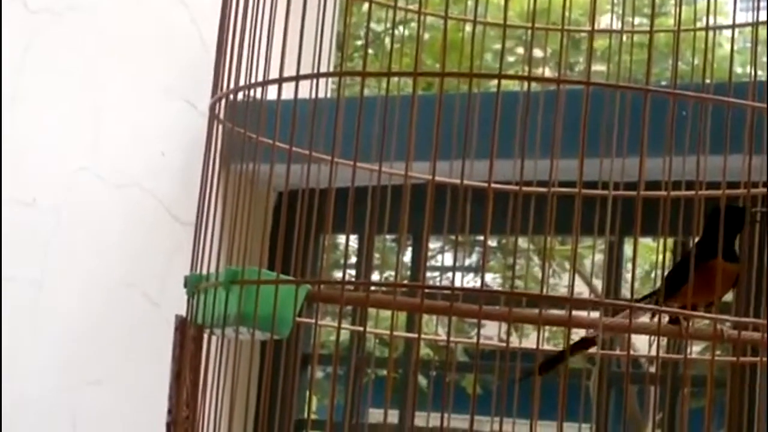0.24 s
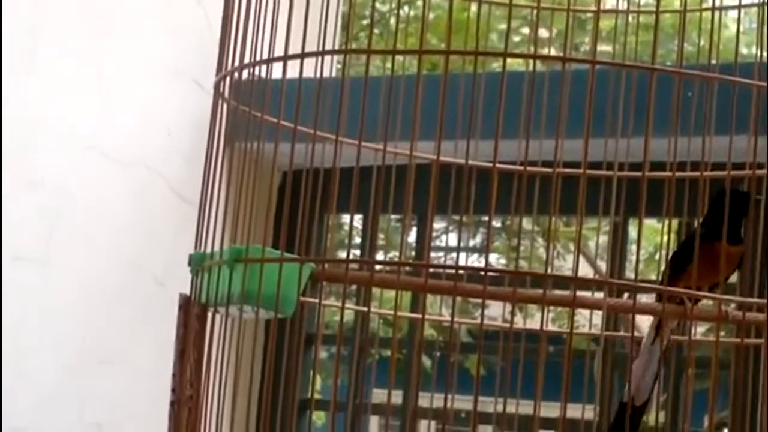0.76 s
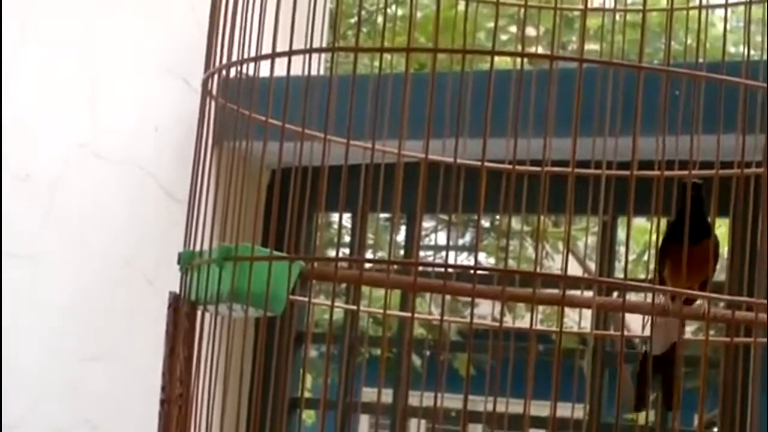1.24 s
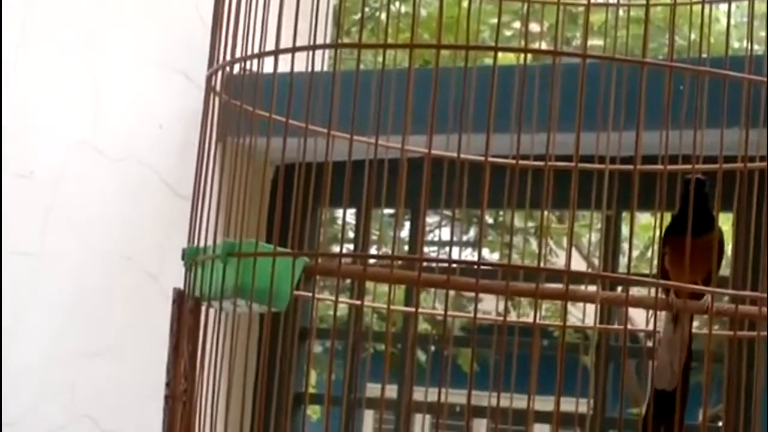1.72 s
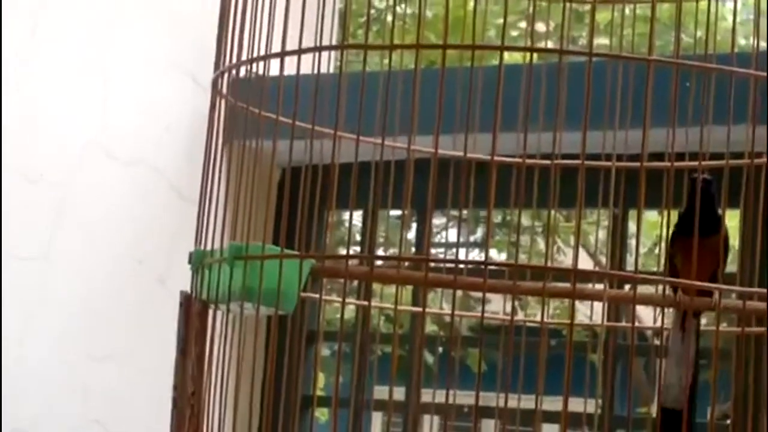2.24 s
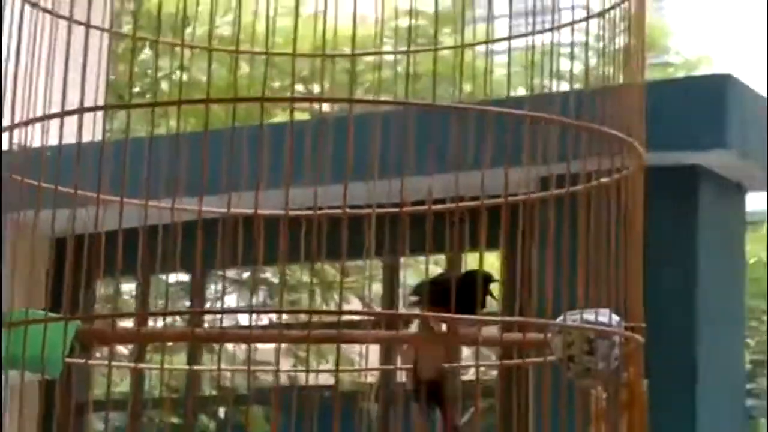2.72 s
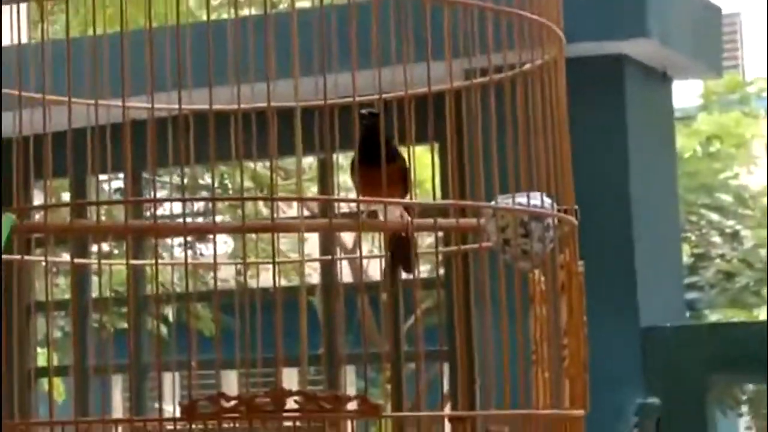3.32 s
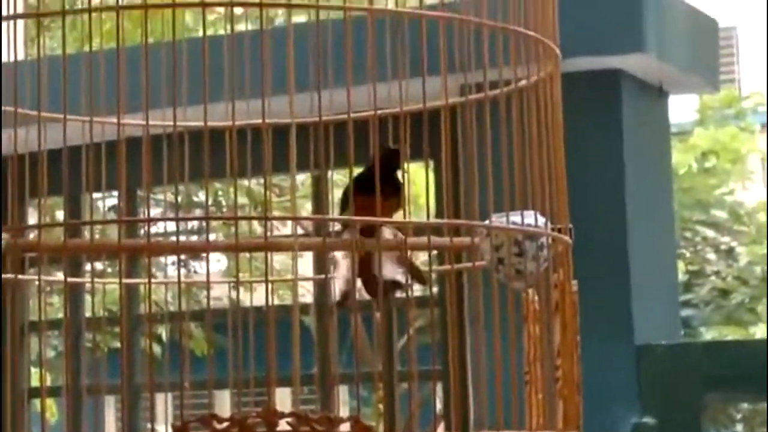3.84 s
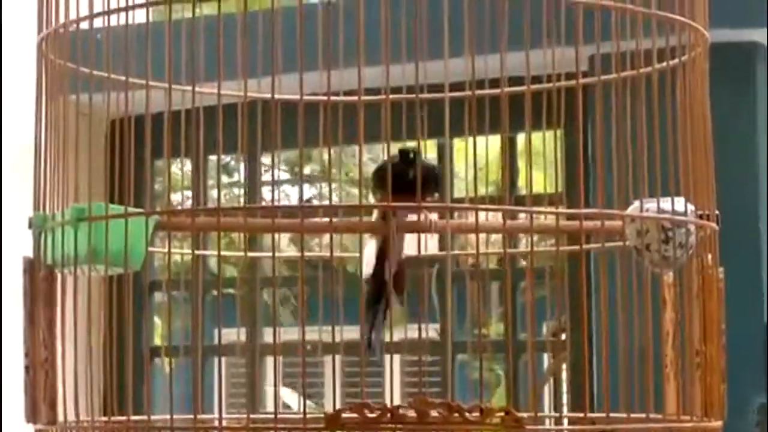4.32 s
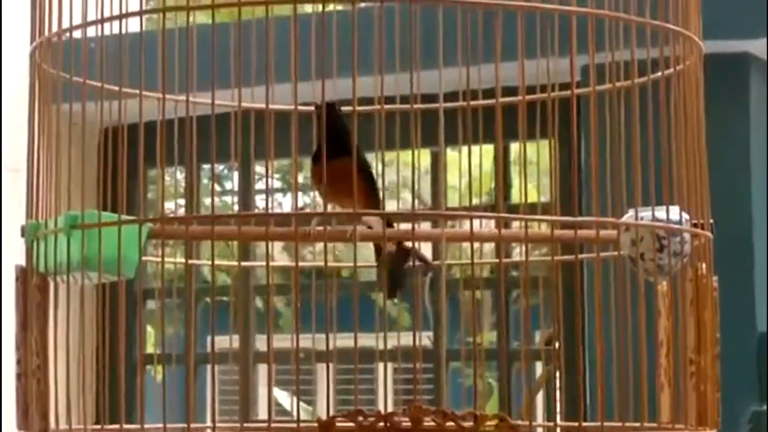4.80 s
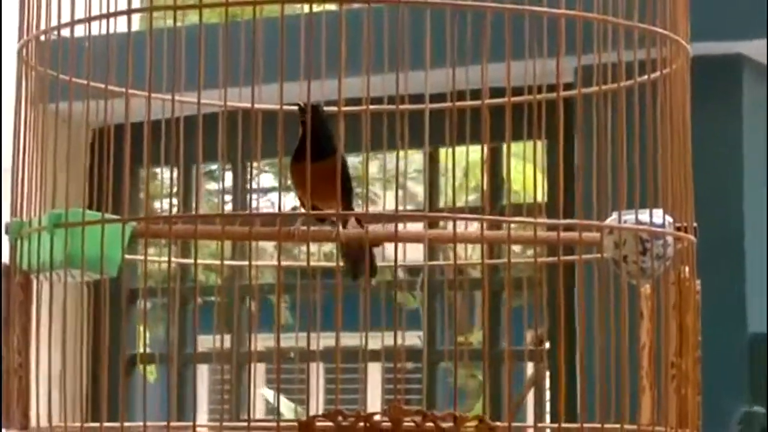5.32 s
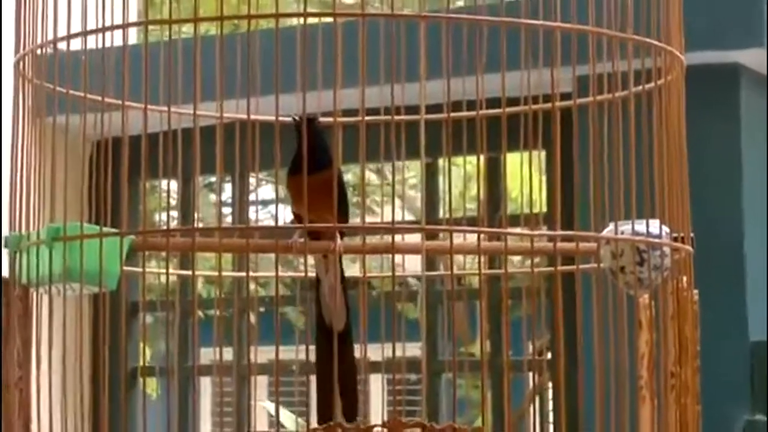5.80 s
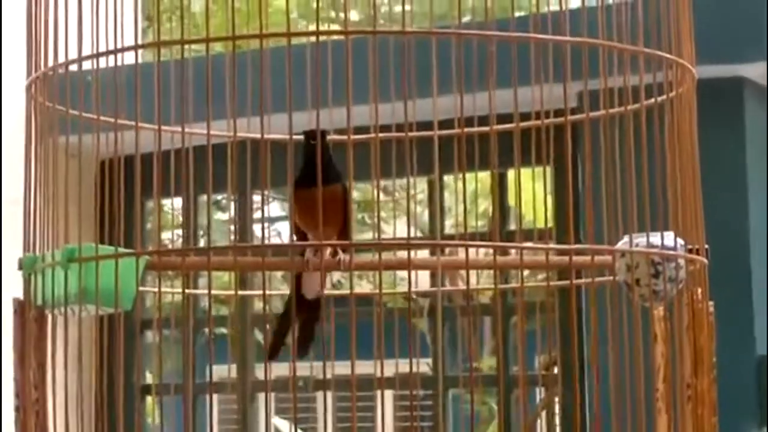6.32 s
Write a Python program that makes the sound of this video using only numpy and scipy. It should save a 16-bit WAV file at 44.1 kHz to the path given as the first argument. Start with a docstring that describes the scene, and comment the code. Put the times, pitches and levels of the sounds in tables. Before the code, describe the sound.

Stereo, fairly close outdoor pickup on a reverberant porch. A small bird chatters quick liquid whistles and dry buzzy trills, pauses, drops four falling yelps, then gives scattered notes and woody clicks from claws or bill. High cricket pulses continue at right. Faint street hush and a distant whine suddenly give way to rougher traffic and a low engine hum, under a final flurry of bright, piercing notes and sweeping two-voiced swoops.

```python
"""Hard-walled porch: a caged shama to the left sings whistles, slurs and buzzy trills with both sides of its syrinx.
Notes are gliding sines with overtones and a little hiss; dry snaps are decaying noise bursts.
A cricket to the right chirps about three times a second in short tones; the walls ring with bird and cricket.
Street noise, quiet at first, with one faint whine, jumps at about four seconds to a louder noise
and the drone of a slowing engine, built from orders of its working cycle."""
import sys
import numpy as np
from scipy import signal
from scipy.fft import rfft, irfft, next_fast_len
from scipy.io import wavfile
from scipy.ndimage import uniform_filter1d, minimum_filter1d, map_coordinates

SR = 44100
rng = np.random.default_rng(int(sys.argv[2]) if len(sys.argv) > 2 else 0)


def bounce(signal):
    """Save signal as a 16-bit WAV file at the path given by the first command-line argument."""
    frames = np.transpose(np.atleast_2d(signal))
    limited = np.clip(frames, -1, 1)
    pcm = np.round(limited * 32767).astype(np.int16)
    wavfile.write(sys.argv[1], SR, pcm)


N = 288855
TIME = np.arange(N) / SR

# Table levels are relative, ahead of the mix gains.
# Clear whistles; overlapping notes come from the two sides of the syrinx:
# (t/s, length/s, start f/Hz, middle f/Hz, end f/Hz, level/dB, place of loudest moment 0-1)
WHISTLES = [(0.0, 0.016, 2100, 2215, 2100, -18.5, 0.12), (.045, .036, 4945, 5060, 5300, -11.5, 0.52),
            (0.1, 0.13, 1542, 1585, 1635, -24.5, 1), (.245, 0.095, 2080, 2140, 1956, -21, 0.88),
            (0.433, 0.043, 1480, 1740, 1650, -25.5, .4), (.474, 0.11, 2045, 2265, 2028, -20.5, 0.25),
            (0.607, 0.096, 3040, 2784, 2743, -16.5, 1), (.666, 0.037, 1210, 1312, 1300, -34.5, 0.77),
            (.778, 0.093, 1903, 1844, 1183, -13.5, 0.092), (0.944, 0.038, 1840, 2527, 2360, -14.5, 0.7),
            (1.04, 0.074, 2225, 1981, 1785, -16.5, 0.4), (1.17, 0.085, 1057, 1630, 1557, -20, 0.99),
            (1.333, 0.045, 1382, 1782, 1838, -8, 0.93), (1.387, 0.05, 1822, 1773, 1780, -12.5, 0.96),
            (1.521, 0.032, 3590, 3196, 2040, -16, 0.44), (2.387, 0.067, 1330, 1232, 967, -18.5, .15),
            (3.324, 0.014, 3010, 2685, 2500, 3, 0.97), (3.503, 0.0188, 2030, 1796, 1640, -16, 0.59),
            (3.51, 0.021, 2750, 3210, 3250, -5.5, 0.73), (4.303, 0.13, 1585, 1250, 1180, -35, 0.26),
            (4.46, 0.052, 1978, 2190, 2160, -23, .35), (4.5, .19, 1202, 1232, 1112, -30.5, 0.26),
            (4.553, 0.032, 2120, 2182, 1930, -15, 0.64), (4.909, 0.05, 2600, 2077, 1787, -21, 0.58),
            (5.003, 0.097, 2876, 3150, 3370, -22.5, 0.72), (5.046, 0.063, 3295, 3619, 3595, -5.5, 0.52),
            (5.101, 0.072, 4850, 5200, 5300, -34, 0.49), (5.17, 0.18, 5290, 5280, 5320, -22, 0.92),
            (5.532, 0.0358, 3234, 3597, 3760, -5.5, 0.4), (5.667, 0.042, 2150, 2920, 3500, -14.5, 0.53),
            (5.709, 0.021, 3580, 3815, 3940, -6, 0.36)]
# Reedy notes with an octave of their own strength:
# (t/s, length/s, start f/Hz, middle f/Hz, end f/Hz, level/dB, octave level/dB)
REEDY_NOTES = [(0.021, 0.026, 2600, 2990, 3420, -24.5, -3), (0.087, 0.036, 2600, 3300, 3310, -25.5, -17),
               (.81, .13, 1947, 2480, 2680, -23.5, -29.5), (.947, .12, 2470, 2900, 2765, -17, -28),
               (2.324, 0.051, 1067, 994, 890, -26.5, -26), (3.291, .038, 3004, 1867, 2820, -10, -17.5),
               (4.037, 0.017, 2060, 1950, 1530, -24.5, -10.5), (4.878, .045, 2234, 2798, 2740, -23, -8.5),
               (5.239, 0.18, 2530, 3198, 3093, -28, -21), (6.056, .07, 1836, 1956, 1845, -37, 4.5)]
# Buzzes on a straight glide: (t/s, length/s, start f/Hz, end f/Hz, level/dB)
BUZZES = [(0.0, 0.015, 5393, 5540, -4), (0.066, 0.021, 5970, 5920, -13), (0.115, 0.038, 5404, 5220, -17),
          (0.163, 0.03, 5530, 5070, -23.5), (1.176, 0.021, 4300, 4170, -16),
          (1.203, 0.068, 4105, 3892, -18), (1.28, 0.047, 3950, 3780, -16.5),
          (1.545, 0.14, 2108, 2209, -15.5), (2.36, 0.0344, 1652, 1918, -11.5),
          (2.7, 0.087, 4163, 4010, -27), (2.941, 0.047, 4130, 4080, -28.5), (3.492, 0.024, 2255, 2510, -11),
          (5.749, 0.065, 3500, 4030, -18.5)]
# Chips, quick downward flicks: (t/s, top f/Hz, level/dB)
CHIPS = [(0.271, 3920, -27), (0.353, 3870, -24), (.433, 4280, -21.5), (1.253, 1605, -24),
         (1.379, 2418, -8.5), (3.109, 3755, -32), (5.728, 3696, -13), (5.786, 4750, -15)]
# Run of low falling yelps: (t/s, top f/Hz, level/dB)
YELPS = [(1.911, 1397, -20.5), (1.974, 1984, -16), (2.056, 1893, -17), (2.149, 1818, -23)]
# Two-voice swoops: (t/s, length/s, level/dB, lower voice start f/Hz, lower voice end f/Hz)
SWOOPS = [(5.437, .08, -12, 3500, 2417), (6.257, .098, -28, 2265, 1310), (6.461, .083, -19, 3340, 2960)]
# Upper voice of every swoop: (start f/Hz, middle f/Hz, end f/Hz)
SWOOP_UPPER_HZ = (5530, 4330, 3236)
# Overtone colour of the beak: (f/Hz, level/dB)
BEAK_COLOUR = [(800, 9.5), (4000, 4), (6200, 4.5), (7000, 5.5), (8700, -3.5), (10500, 2), (12000, 2.5),
               (15000, -1.5)]
# Hiss spectrum in the song: (f/Hz, level/dB)
HISS_COLOUR = [(500, -9.5), (1500, 1), (3500, 10.5), (6000, -12), (7200, -24.5), (8700, -18), (10300, -2),
               (12000, -14.5), (15000, -13)]
# Song is brighter when the open beak points this way: (t/s, overtone and hiss gain/dB)
BEAK_AIM = [(0, 1), (.8, -1), (1.4, 0), (2.3, 6), (3.3, 1), (3.6, -3), (5.1, 6), (5.8, 3), (6.5, -0.5)]
# Left-right balance of the song, shifting with the wall reflections: (t/s, left-minus-right level/dB)
SONG_BALANCE = [(0, 5.5), (.6, 6), (1.2, 3.5), (1.5, 14.5), (2.2, 7), (3.4, 7), (4.5, 6), (5.4, 1.5),
                (6.5, 0.5)]
# Bird stays to the left: (t/s, lead of left ear/s)
LEFT_EAR_LEAD = [(0, 0.00022), (1.3, 0.00016), (3.3, 0.00019), (5, 0.00018), (5.5, 0.00022)]
# Porch reverberation by band: (f/Hz, t60/s, level/dB)
PORCH_BANDS = [(294, 0.22, 21), (993, 0.53, 8.5), (1980, 0.68, 5.5), (3500, 0.5, 8.5), (5560, 0.69, 4.5),
               (7700, 0.33, 2), (10300, 0.41, 13.5), (14400, 0.054, 10)]
# Street noise before and after the jump: (t/s, level/dB)
CALM_LEVELS = [(0.0, -58), (1.75, -64), (3.38, -55.5), (3.8, -68.5), (4.05, -58.5)]
BUSY_LEVELS = [(4.07, -48.5), (4.44, -46), (6.55, -56.5)]
# Their spectra: (f/Hz, relative density/dB per Hz)
CALM_COLOUR = [(25, -19), (60, 1.5), (150, 3), (260, -5.5), (600, -7), (1200, -15), (3000, -18.5),
               (6000, -28.5), (8000, -27.5), (15000, -66.5)]
BUSY_COLOUR = [(25, 9.5), (70, 2.5), (160, 9.5), (260, -2), (550, 2), (850, -7), (1500, -3.5), (3500, -9),
               (6000, -14), (8000, -25), (15000, -83)]
# Street noise shared by the ears: (f/Hz, left-right likeness 0-1)
STREET_LIKENESS = [(50, 0.84), (200, 0.78), (500, 0.42), (1200, 0.4), (3000, 0.1), (10000, 0.082)]
# Cricket chirps: (t/s, level/dB)
CHIRPS = [(0.4099, -26), (0.7037, -25.5), (1.0264, -25.5), (1.3095, -27.5), (1.6006, -31), (1.9264, -30.5),
          (2.2238, -28.5), (2.525, -28), (2.9239, -25), (3.1959, -25.5), (3.4613, -29.5), (3.716, -29),
          (4.274, -34), (4.5463, -30.5), (4.8618, -28.5), (5.1414, -30), (5.4219, -31.5), (5.7328, -35),
          (6.0661, -42), (6.318, -40.5)]
# Bill snaps, wing flicks, claws landing on the perch: (t/s, onset level/dB, decay/s)
SNAPS = [(2.17, -52, 0.035), (2.903, -36, 0.0073), (3.112, -35.5, 0.0029), (4.025, -43.5, 0.0047),
         (4.036, -32.5, 0.0015), (4.503, -31.5, 0.0038), (4.692, -33, 0.0064), (4.852, -36.5, 0.021)]
# Snap spectrum: (f/Hz, level/dB)
SNAP_COLOUR = [(300, -70), (900, 0.5), (2000, -5), (3800, 5.5), (5500, -4), (8000, -7), (11000, -33.5),
               (15000, -33)]
# Engine: (t/s, working cycle f/Hz, firing tone level/dB, rest of drone level/dB)
ENGINE = [(4.06, 34.5, -42.5, -43.5), (4.32, 32.9, -47.5, -38), (4.48, 31.65, -38.5, -36.5),
          (5.13, 29.13, -41.5, -37.5), (5.48, 29.14, -30.5, -38.5), (5.77, 28.7, -48.5, -50.5),
          (6.55, 28.62, -45.5, -41.5)]
# Drone orders: (multiple of cycle frequency, level/dB)
ENGINE_ORDERS = [(1, -4), (2, 5), (3, 2.5), (5, 11), (6, 2), (7, -10), (9, -8.5), (12, -0.5), (15, -3),
                 (17, 3.5), (20, -4), (28, -9)]

RISE_SHARE, RELEASE_S = 0.16, 0.0038  # longer notes take longer to start
DROOP_DB, DROOP_CURVE = 15, 1.583  # weakening on both sides of the loudest moment
REEDY_SMEAR = 0.25
BUZZ_DEPTH, BUZZ_PEAK_AT = 0.069, 0.25  # trill as share of pitch; place of loudest moment
CHIP_S, CHIP_FALL = 0.01822, 0.76  # length; end pitch as share of top
YELP_FALL_HZ_PER_S, YELP_END_HZ = 21000, 777
LOWER_LAG_S, LOWER_DB = 0.016, -10.5  # lower swoop voice: late and softer
STREET_CHANGE_S = 4.057
EDGE_HZ = 15000  # upper band limit


def amp(db):
    """Decibels to gain."""
    return 10 ** (np.asarray(db) / 20)


def unit(x):
    """Scales to rms 1."""
    return x / np.sqrt(np.mean(x ** 2) + 1e-20)


def read(points, hz, axis=1):
    """One table column, interpolated along log frequency."""
    table = np.transpose(points)
    return np.interp(np.log(abs(hz) + 1), np.log(table[0] + 1), table[axis])


def over_time(points, t_s):
    """Second table column, interpolated linearly in time."""
    return np.interp(t_s, *np.transpose(points))


def add(mix, s, sound):
    """Adds a sound to the mix at time s."""
    part = mix[:, max(round(s * SR), 0):][:, :sound.shape[-1]]
    part += sound[..., :part.shape[1]]


def coloured(x, colour):
    """Filters by a spectrum, to rms 1."""
    size = x.shape[-1]
    gain = amp(read(colour, np.fft.rfftfreq(size, 1 / SR)))
    return unit(irfft(rfft(x) * gain, size))


def wander(size, hz):
    """Smooth random signal of rms about 1, low-passed softly around hz."""
    full = next_fast_len(size + 8192)
    low_pass = np.exp(-(np.fft.rfftfreq(full, 1 / SR) / hz) ** 2)
    return unit(irfft(rfft(rng.standard_normal(full)) * low_pass, full))[:size]


def fade(t, length_s, rise_s, fall_s):
    """Soft start and end of a sound."""
    rise = np.clip(t / rise_s, 0, 1)
    fall = np.clip((length_s - t) / fall_s, 0, 1)
    return np.sin(np.pi / 2 * rise * fall) ** 2


def note_hiss(size, level_db=-33):
    """Faint hiss that follows the level of every note."""
    return amp(level_db) * coloured(rng.standard_normal(size), HISS_COLOUR)


def note(s, length_s, pitches_hz, level_db, peak_at, overtone_db, trill=0, smear=0.66, trill_hz=185,
         jitter=0.0061, rough=0.38, flutter=0.043, third_db=-9, higher_db=-14):
    """A nearly pure tone on one smooth glide and one swell; a fast trill of the membrane makes it buzz."""
    t = np.arange(int(length_s * SR)) / SR
    size = len(t)
    places_s = np.linspace(0, length_s, len(pitches_hz))
    glide_hz = np.polyval(np.polyfit(places_s, pitches_hz, len(pitches_hz) - 1), t)
    shake_hz = trill_hz * (1 + 0.093 * wander(size, 59))
    shake = np.sin(2 * np.pi * np.cumsum(shake_hz) / SR)
    trill_share = trill * (shake + rough * wander(size, 510))
    hz = glide_hz * (1 + trill_share + jitter * wander(size, 290))
    phase = 2 * np.pi * np.cumsum(hz) / SR

    swell_db = level_db - DROOP_DB * abs(t / length_s - peak_at) ** DROOP_CURVE
    swell = amp(swell_db) * fade(t, length_s, RISE_SHARE * length_s, RELEASE_S)
    swell *= 1 + flutter * (trill > 0) * shake

    tone = np.sin(phase)
    aim = amp(over_time(BEAK_AIM, s))
    # cycles differ in shape, which smears the overtones
    blur = smear * wander(size, 500)
    for k in range(2, 5):
        # throat may favour the octave; higher overtones start from a capped level
        if k == 2:
            db = overtone_db
        else:
            db = min(overtone_db, -15) + third_db + higher_db * np.log2(k / 3)
        gain = aim * amp(db + read(BEAK_COLOUR, k * hz))
        below_edge = np.clip((EDGE_HZ - k * hz) / 1000, 0, 1)
        tone += gain * np.sin(k * phase + (k - 1) * blur) * below_edge
    # buzzes carry more hiss
    hiss = aim * (1 + 12 * trill) * note_hiss(size)
    return s, swell * (tone + hiss)


def shama():
    """Song as it leaves the beak: six kinds of syllable, each with its own shape."""
    song = np.zeros((1, N))
    for s, length_s, *pitches_hz, db, peak_at in WHISTLES:
        add(song, *note(s, length_s, pitches_hz, db, peak_at, overtone_db=-37.5))
    for s, length_s, *pitches_hz, db in BUZZES:
        add(song, *note(s, length_s, pitches_hz, db, BUZZ_PEAK_AT, overtone_db=-36, trill=BUZZ_DEPTH))
    for s, length_s, *pitches_hz, db, octave_db in REEDY_NOTES:
        add(song, *note(s, length_s, pitches_hz, db, peak_at=0.45, overtone_db=octave_db, smear=REEDY_SMEAR))
    for s, top_hz, db in CHIPS:
        fall_hz = (top_hz, top_hz * CHIP_FALL)
        add(song, *note(s, CHIP_S, fall_hz, db, peak_at=0.62, overtone_db=-27.5, trill=0.055))
    for s, top_hz, db in YELPS:
        length_s = (top_hz - YELP_END_HZ) / YELP_FALL_HZ_PER_S
        add(song, *note(s, length_s, (top_hz, YELP_END_HZ), db, peak_at=0.23, overtone_db=-51.5))
    for s, length_s, db, *lower_hz in SWOOPS:
        add(song, *note(s, length_s, SWOOP_UPPER_HZ, db, peak_at=0.62, overtone_db=-28.5,
                        smear=3.5, jitter=0.011))
        add(song, *note(s + LOWER_LAG_S, length_s, lower_hz, db + LOWER_DB, peak_at=0.49, overtone_db=-19))
    return song


def ear_delay(pair):
    """Direct sound from the left reaches the left ear a little before the right."""
    lag = over_time(LEFT_EAR_LEAD, TIME) * SR
    return np.array([pair[0], map_coordinates(pair[1], [np.arange(N) - lag], order=5)])


def near_wall(pair, left_s=0.0028, right_s=0.0055, wall_db=-11):
    """The wall beside the cage sends back a quick echo, which makes gliding notes flutter."""
    echo = [np.interp(TIME - delay_s, TIME, side, left=0) for side, delay_s in zip(pair, (left_s, right_s))]
    return pair + amp(wall_db) * np.array(echo)


def porch(x, gap_s=0.0019, early_db=4, early_s=0.034, walls_db=-11):
    """A few slaps from the nearest walls and a dense tail in which each band dies at its own speed."""
    taps = rng.standard_normal((2, SR)) * (rng.random((2, SR)) < 4000 / SR)
    hz, t, z = signal.stft(taps, SR, nperseg=256)
    band_db = read(PORCH_BANDS, hz, axis=2)[:, None]
    decay_db = 60 * t / read(PORCH_BANDS, hz)[:, None]
    z = z * amp(band_db - decay_db + early_db * np.exp(-t / early_s))
    tail = signal.istft(z, SR, nperseg=256)[1][:, :SR]
    tail = tail * np.clip(TIME[:SR] / gap_s - 1, 0, 1)
    tail /= np.linalg.norm(tail, axis=1, keepdims=True)
    for side in tail:
        slaps = (SR * rng.uniform(0.005, 0.035, size=6)).astype(int)
        side[slaps] += amp(walls_db) * rng.choice([-1, 1], size=6)
    return signal.fftconvolve(x, tail, axes=1)[:, :N]


def street(levels, colour, level_db):
    """Distant traffic as coloured noise, most alike in both ears in the bass, swelling gently."""
    a, b = rfft(rng.standard_normal((2, N)))
    same = np.clip(read(STREET_LIKENESS, np.fft.rfftfreq(N, 1 / SR)), -1, 1)
    pair = irfft(np.array([a, same * a + np.sqrt(1 - same ** 2) * b]), N)
    swell_db = 0.9 * wander(N, 6)
    return coloured(pair, colour) * amp(over_time(levels, TIME) + level_db + swell_db)


def cricket(stroke_s=0.0275, length_s=0.014, top_hz=6220, end_hz=5700, tiring_db=-0.12, octave_db=-32,
            count=4):
    """Each wing stroke rings a short tone that sags as the wing slows; strokes of a chirp weaken a little."""
    out = np.zeros((1, N))
    t = np.arange(int(length_s * SR)) / SR
    for s, db in CHIRPS:
        for k in range(count):
            sag_hz = top_hz + (end_hz - top_hz) * t / length_s
            hz = sag_hz * (1 + 0.014 * wander(len(t), 500))
            phase = 2 * np.pi * np.cumsum(hz) / SR
            ring = np.sin(phase) + amp(octave_db) * np.sin(2 * phase)
            ring *= fade(t, length_s, 0.0066, 0.0033)
            add(out, s + k * stroke_s, amp(db + tiring_db * k) * ring[None])
    return out


def snaps(level_db=-6):
    """Dry, woody cracks and softer feather flicks: coloured noise with exponential decay."""
    out = np.zeros((1, N))
    t = np.arange(8192) / SR
    for s, db, decay_s in SNAPS:
        burst = coloured(rng.standard_normal((1, len(t))), SNAP_COLOUR)
        add(out, s, amp(db + level_db) * burst * np.exp(-t / decay_s))
    return out


def whine(start_s=2.86, length_s=0.71, high_hz=670, low_hz=550, level_db=-56):
    """A faint, falling, unsteady whine from far down the street."""
    fall_hz = np.interp(TIME, [start_s, start_s + length_s], [high_hz, low_hz])
    hz = fall_hz * (1 + 0.0665 * wander(N, 78))
    tone = np.sin(2 * np.pi * np.cumsum(hz) / SR)
    return amp(level_db) * fade(TIME - start_s, length_s, 0.2, 0.13) * tone


def engine(firing_db=-1, drone_db=0, unsteady=0.0044, rough=0.51):
    """Four firings a cycle give the main tone; uneven cylinders fill in the other orders."""
    t_s, *columns = np.transpose(ENGINE)
    cycle_hz, tone_db, rest_db = (np.interp(TIME, t_s, column) for column in columns)
    phase = 2 * np.pi * np.cumsum(cycle_hz * (1 + unsteady * wander(N, 8.8))) / SR
    firing = np.sin(4 * phase)
    drone = np.zeros(N)
    for k in np.setdiff1d(np.arange(1, 29), 4):
        strength = amp(read(ENGINE_ORDERS, k)) * (1 + rough * wander(N, 2.9))
        drone += strength * np.sin(k * phase + 2 * np.pi * rng.random())
    return unit(firing) * amp(tone_db + firing_db) + unit(drone) * amp(rest_db + drone_db)


def scene():
    """Bird and snaps to the left, cricket to the right, street behind."""
    song, chirps, cracks = shama(), cricket(), snaps()
    balance_db = over_time(SONG_BALANCE, TIME)
    bird = song * amp(np.array([balance_db, -balance_db]) / 2)
    near = near_wall(ear_delay(bird + amp(15.5) * cracks)) + chirps * amp([[-10], [4]])
    walls = porch(amp(-2) * song + amp([[6], [10]]) * chirps + amp(17) * cracks)

    busy = np.clip((TIME - STREET_CHANGE_S) / 0.0013, 0, 1)
    calm_street = street(CALM_LEVELS, CALM_COLOUR, level_db=4)
    busy_street = street(BUSY_LEVELS, BUSY_COLOUR, level_db=9) + engine()
    outside = (1 - busy) * calm_street + busy * busy_street
    return near + walls + (outside + whine()) * amp([[0.4], [-0.4]])


def record(dry):
    """A quick limiter holds down the loudest notes; then the band limit."""
    peak = -minimum_filter1d(-abs(dry).max(0), 200)
    held = dry / uniform_filter1d(np.maximum(peak / 0.95, 1), 200)
    low_pass = signal.firwin(511, EDGE_HZ, window=("kaiser", 9), fs=SR)
    return signal.oaconvolve(held, low_pass[None], "same")


dry = scene()
out = record(dry)
bounce(out)
```